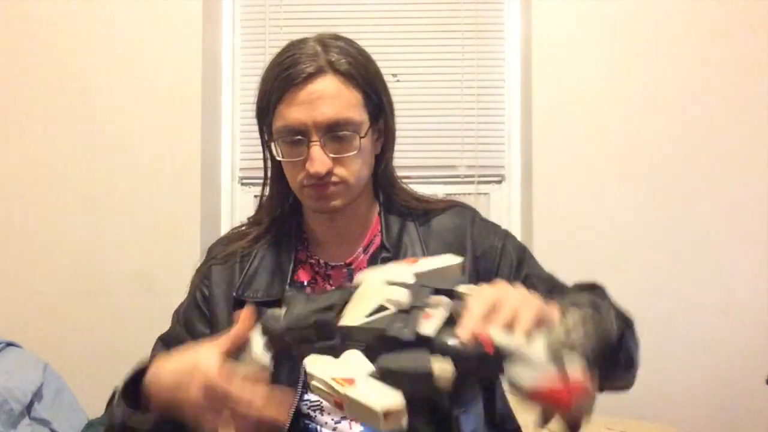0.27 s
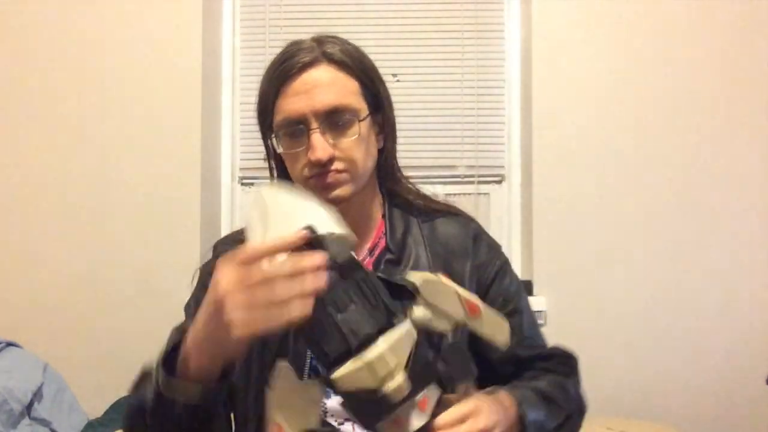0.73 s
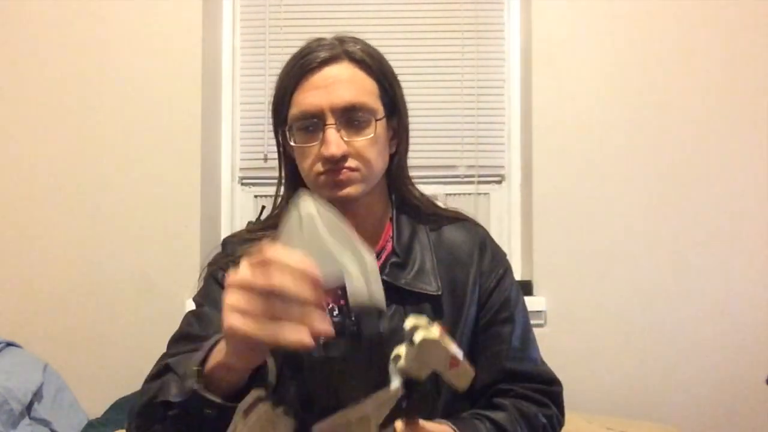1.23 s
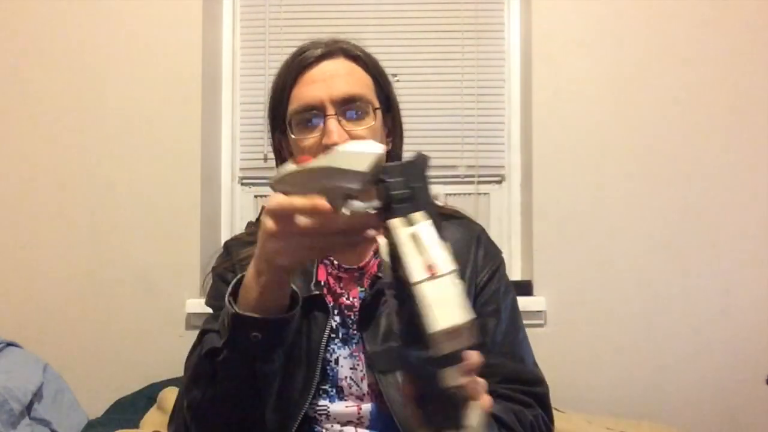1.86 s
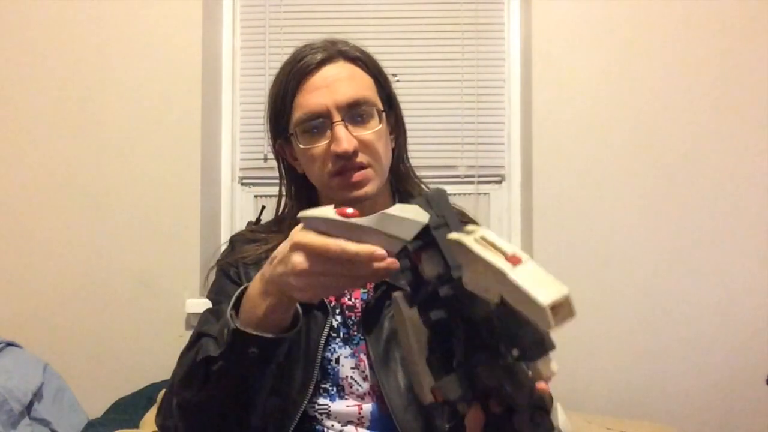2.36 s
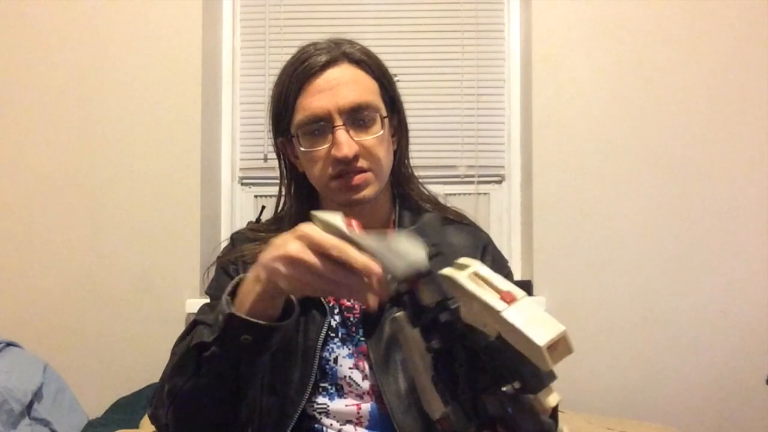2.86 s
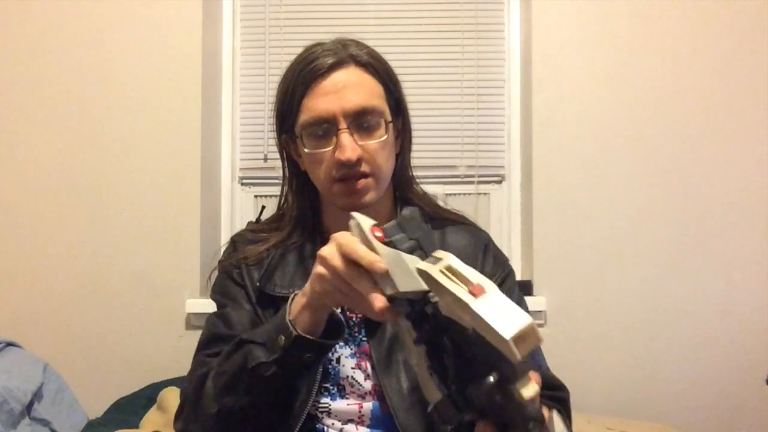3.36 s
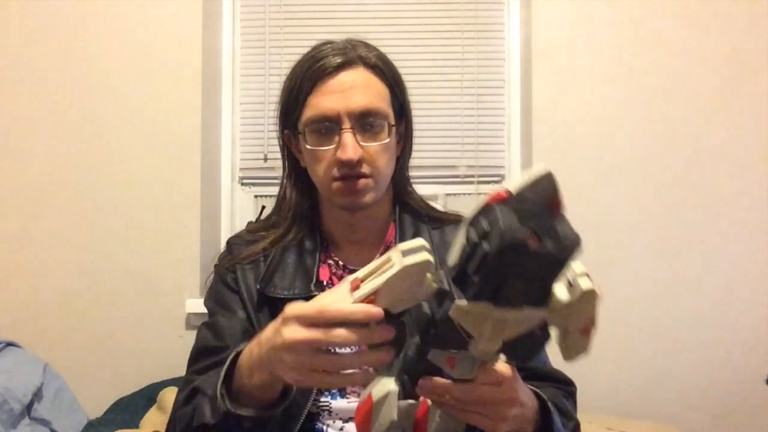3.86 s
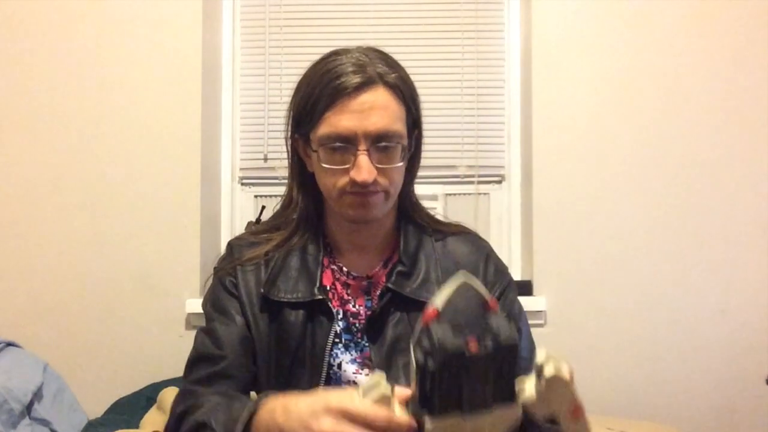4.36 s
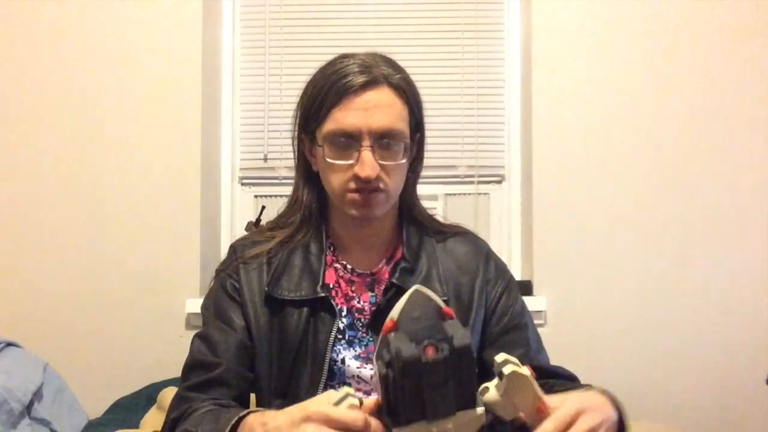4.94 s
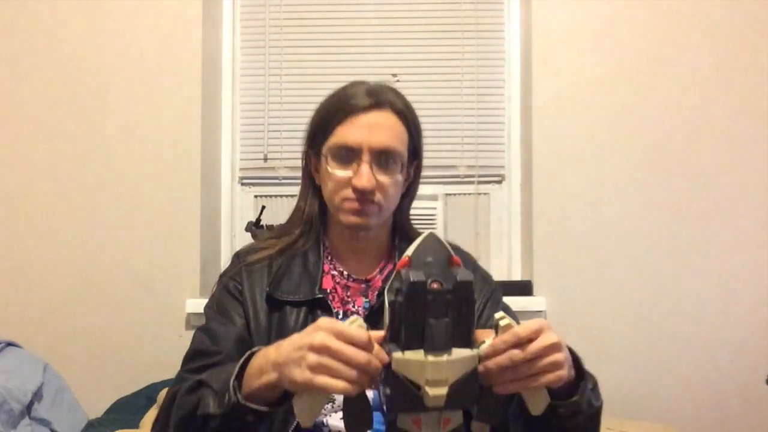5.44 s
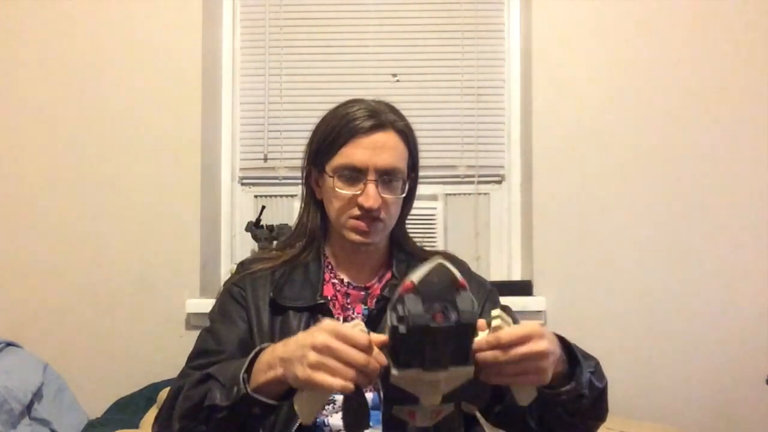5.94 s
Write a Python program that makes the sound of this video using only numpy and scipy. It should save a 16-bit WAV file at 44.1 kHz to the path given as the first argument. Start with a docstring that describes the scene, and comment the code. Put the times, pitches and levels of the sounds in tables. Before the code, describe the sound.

Stiff toy joints click from tooth to tooth as someone moves the parts by hand. After loose panel clacks, a tight double snap leads into a quick run of sharp clicks, then isolated snaps and two firm knocks. Quieter ticks and plastic rubbing continue irregularly, picking up at the close. The sounds are near and dry, with a short bright indoor reverberation and a faint steady background hiss.

```python
"""A large hollow plastic toy robot is folded by hand in a small, bare room: its ratchet joints snap from tooth
to tooth, as short bright contacts ringing pawl and shell. Loose panels knock with duller clacks. Each move of
the hands rubs the plastic in stick-slip ticks and shakes faint ticks out of the loose parts. Behind them are a
soft rumble from the arms and the room's faint steady noise."""
import sys
import numpy as np
from scipy import signal
from scipy.fft import rfft, irfft
from scipy.io import wavfile
from scipy.ndimage import map_coordinates

SR = 44100
rng = np.random.default_rng(int(sys.argv[2]) if len(sys.argv) > 2 else 0)


def digitize_waveform(pressure):
    """Quantize a signal to 16-bit integers and store it at the path in sys.argv[1].

    Rows of a 2-D input are taken as channels; values are limited to [-1, 1].
    """
    field = np.atleast_2d(pressure).T
    bounded = np.clip(field, -1, 1)
    quanta = np.round(bounded * 32767).astype(np.int16)
    wavfile.write(sys.argv[1], SR, quanta)


N = 273420
SIZE = 8192  # samples per impulse response
GRID = np.fft.rfftfreq(SIZE, 1 / SR)  # Hz


# Ratchet teeth. Each row: time in seconds, level in dB before gain_db, then relative to the crack band
# thump in dB, body in dB, treble in dB, and two resonances of the joint in Hz.
TEETH = [(1.309, -16, -14, -14, 0, 3800, 13200), (1.3174, -14.5, -17.5, -6, 3.5, 12900, 4860),
         (1.563, -12.5, -31, -7.5, 2, 13200, 8450), (1.6266, -11, -36.5, -10, -0.5, 4320, 12800),
         (1.692, -16, -24.5, -10, 0.5, 4440, 3200), (1.7546, -14.5, -29, -9.5, 0, 2930, 13800),
         (1.823, -15.5, -31.5, -2, 1.5, 2130, 4540), (2.212, -15, -23, -4.5, 4, 8440, 13100),
         (2.477, -15.5, -30, -5, 4, 4800, 11300)]
# Stiff pawl resonances. Each row: centre in Hz, width in Hz, lift in dB.
PAWL_MODES = [(4160, 200, 4.1), (6090, 480, 5.9), (8750, 1460, 4), (10740, 1500, 6.6), (13200, 670, 2.1)]
# Broad colour of a snap. Each row: frequency in Hz, relative level in dB.
SNAP_COLOUR = [(30, -40.5), (150, -20.5), (500, -15.5), (900, -11.5), (1400, -1.5), (4000, 5), (8000, 1.5),
               (12000, -2.5), (15000, 3.5), (16000, -17.5)]
TOOTH_LIFT_DB, TOOTH_ROOM_DB, TOOTH_T60_S = 7.5, 2.5, 0.014  # room: re direct sound
# the pawl catches lightly before it gives
TOOTH_LEAD_S, TOOTH_LEAD_DB = 0.009, -27.5


def ratchet(gain_db=21, push_db=-33, push_s=0.0006, push_per_thump=0.34):
    """A sprung pawl catches, then drops into each tooth: short, hard, bright, with one low push of the shell."""
    out = np.zeros(N)
    u = np.arange(SR // 50) / SR / push_s
    push = (1 - u) * np.exp(-u)
    usual_thump_db = np.mean(TEETH, axis=0)[2]
    for s, db, thump_db, body_db, treble_db, hz1, hz2 in TEETH:
        joint_db = part_ring(hz1, TOOTH_LIFT_DB) + part_ring(hz2, TOOTH_LIFT_DB)
        colour_db = along(SNAP_COLOUR) + lifts(PAWL_MODES) + joint_db
        snap = click(colour_db, thump_db, body_db, treble_db, TOOTH_ROOM_DB, TOOTH_T60_S)
        add(snap, 0, amp(push_db + push_per_thump * (thump_db - usual_thump_db)) * push)
        add(out, s, amp(db + gain_db) * snap)
        catch = knock(thump_db=-15.5, body_db=-8, treble_db=-1, hz=hz1)
        add(out, s - TOOTH_LEAD_S, amp(db + gain_db + TOOTH_LEAD_DB) * catch)
    return out


# Panels and limbs touching. Each row: time in seconds, level in dB before gain_db, then relative to the
# crack band thump in dB, body in dB, treble in dB, and the part's resonance in Hz.
PANEL_KNOCKS = [(0.093, -39, -6.5, 1.5, -2.5, 1270), (0.125, -37.5, -34, -26, -35, 3990),
                (0.264, -64, -17, 13, -25, 1640), (0.31, -46.5, -15, -5, -2, 4200),
                (0.393, -46.5, -12, -5, -2, 4320), (0.463, -22.5, -30, -11, -1, 3220),
                (0.678, -46, -13, 0, -6, 2960), (0.807, -49.5, -18, 13, 1, 1860),
                (0.899, -31, -7.5, 0, -9.5, 362), (0.979, -30, -22, -10, -5.5, 1760),
                (0.998, -33.5, -10, 3, -4, 1806), (1.035, -33.5, -14, -2, -12, 3130),
                (1.058, -25, -24, -9.5, -2.5, 3140), (1.219, -46, -30, -7.5, -25, 1360),
                (1.284, -38.5, -31, -7, -7, 3980), (1.981, -29, -18.5, -4.5, -10.5, 2750),
                (2.09, -27, -18.5, -6.5, -15, 2390), (2.158, -56.5, -3, 13, 13, 1310),
                (2.336, -43.5, -3.5, 8, -24, 1740), (2.744, -46.5, -20.5, 3.5, -37, 1300),
                (2.865, -45.5, 12, 3, 0, 705), (2.9, -39.5, -3, -4, -9, 2300),
                (2.925, -35.5, 0, 1, -10, 2200), (2.941, -26.5, -20, -1.5, -10, 2260),
                (2.959, -14.5, -21.5, -9.5, -8, 4580), (3.308, -20.5, -16, 2.5, 1, 1175),
                (3.524, -44.5, -17.5, 8, -6.5, 1800), (3.657, -48, -6, 0, -20.5, 1700),
                (3.804, -46, -11, 3, -25, 1620), (4.049, -52, -13, -18, 0, 1360),
                (4.135, -35, -49, 2, -6.5, 2130), (4.22, -47.5, -25, -7, -1.5, 1740),
                (4.382, -50.5, -31, -4.5, 0.5, 3300), (4.46, -45.5, -19, -12, -27, 2720),
                (4.526, -46, -25, -4.5, 10.5, 1790), (4.552, -44, -34, 1, 8.5, 5160),
                (4.715, -35.5, -30, -5.5, -4.5, 3120), (4.796, -44.5, -18, 1.5, 0.5, 3700),
                (4.887, -59.5, 2, 14, -26, 760), (4.946, -39.5, -21, -3.5, -6.5, 3040),
                (4.967, -40.5, -20, 1.5, -14, 1520), (5.188, -53.5, -0.5, -2.5, -10, 3100),
                (5.466, -35, -34, -17, -8.5, 3940), (5.493, -41, -18, -6, 3, 2700),
                (5.59, -42.5, -9, 2, 5.5, 1810), (5.692, -41, -16, -5.5, 1, 3310),
                (5.787, -48, -11, 0, -13, 1760), (5.84, -31, -32, -7, -0.5, 4860),
                (5.908, -31, -30, -14, -7, 3000), (5.929, -26.5, -22, -14, -3, 1570),
                (5.965, -27.5, -21, -3.5, -9, 1450), (6.026, -31.5, -18, -1, -12.5, 760),
                (6.148, -33, -26, -1, -20, 1670)]
KNOCK_LEAD_S, KNOCK_LEAD_DB = 0.0031, -14  # graze, re main contact


def knocks(gain_db=21):
    """Loose parts graze, then meet with a longer, duller clack."""
    out = np.zeros(N)
    for s, db, *part in PANEL_KNOCKS:
        clack = amp(db + gain_db) * knock(*part)
        add(out, s - KNOCK_LEAD_S, amp(KNOCK_LEAD_DB) * clack)
        add(out, s, clack)
    return out


# Broad colour of a knock. Each row: frequency in Hz, relative level in dB.
KNOCK_COLOUR = [(30, -32.5), (150, -21), (500, -5), (900, -3), (1400, 2.5), (4000, 2.5), (7000, -7),
                (11000, -15.5), (14000, -21), (16000, -27)]
KNOCK_LIFT_DB, KNOCK_ROOM_DB, KNOCK_T60_S = 10.5, 2.5, 0.03  # room: re direct sound


def knock(thump_db, body_db, treble_db, hz):
    """One clack of a loose part, lifted at the part's own resonance."""
    colour_db = along(KNOCK_COLOUR) + part_ring(hz, KNOCK_LIFT_DB)
    return click(colour_db, thump_db, body_db, treble_db, KNOCK_ROOM_DB, KNOCK_T60_S)


# Edges in Hz of a contact's thump, body, crack (the 0 dB reference) and treble bands.
BAND_EDGES_HZ = [150, 800, 2200, 6000, 15000]
# Hollow shell resonances. Each row: centre in Hz, width in Hz, lift in dB.
SHELL_MODES = [(317, 70, 4.5), (756, 210, 5.5), (1152, 95, 6.5), (1740, 210, 4), (2820, 820, 3.5),
               (4930, 1400, 1.5)]


def click(colour_db, thump_db, body_db, treble_db, room_db, t60):
    """One contact rings the shell and is heard directly and from the walls."""
    # each spot favours others of the shell's many weak modes
    spot_noise = rng.standard_normal(len(GRID))
    spot_db = 1.2 * unit(signal.fftconvolve(spot_noise, np.hanning(45), "same"))
    colour_db = colour_db + lifts(SHELL_MODES) + spot_db
    power = 2 * amp(colour_db) ** 2 / SIZE
    # where and how hard the parts meet sets the balance from thump to treble
    balance = []
    band_levels_db = [thump_db, body_db, 0, treble_db]
    for lo, hi, db in zip(BAND_EDGES_HZ, BAND_EDGES_HZ[1:], band_levels_db):
        band_power = power[(GRID > lo) & (GRID < hi)].sum()
        balance.append((np.sqrt(lo * hi), db - 10 * np.log10(band_power)))
    paths = amp(room_db) * walls()
    add(paths, 0, chatter(t60))
    return signal.fftconvolve(paths, ring(colour_db + along(balance)))


def part_ring(hz, lift_db, least_hz=140, damping=0.05):
    """The dB added by the struck part's own resonance, wide because plastic is well damped."""
    return lifts([(hz, least_hz + damping * hz, lift_db)])


def chatter(t60, rise_s=0.00029, grain_db=2, grains_per_s=1476):
    """One hard contact, of energy 1: a dying run of uneven micro-impacts."""
    t = np.arange(SIZE) / SR
    level_db = grain_db * wobble(grains_per_s, SIZE) - 60 * t / t60
    burst = rng.standard_normal(SIZE) * amp(level_db)
    burst *= 1 - np.exp(-(t / rise_s) ** 2)
    return burst / np.linalg.norm(burst)


def rattle(count=48, crowding=0.41, gain_db=18, scatter_db=2, thump_db=-13, body_db=-2, treble_db=-5,
           colour_scatter_db=2.5, part_hz=2200, spread_octaves=0.9):
    """While the hands move, small loose parts tick unevenly: louder and denser with more effort."""
    out, gain = np.zeros(N), effort()
    work = np.cumsum(gain ** crowding)
    shares = (np.arange(count) + rng.random(count)) / count
    moments = np.searchsorted(work / work[-1], shares)
    for at, (force, weight, hardness, part) in zip(moments, rng.standard_normal((count, 4))):
        tick = knock(thump_db, body_db + colour_scatter_db * weight,
                     treble_db + colour_scatter_db * hardness, part_hz * 2 ** (spread_octaves * part))
        add(out, at / SR, gain[at] * amp(gain_db + scatter_db * force) * tick)
    return out


# Broad colour of rubbing. Each row: frequency in Hz, relative level in dB.
RUB_COLOUR = [(120, -51.5), (200, -31), (360, -10.5), (416, -30), (538, -15), (735, -5), (968, -9.5),
              (1400, -4.5), (2290, -6), (3190, -5.5), (3620, -7.5), (5520, -9), (6280, -13), (10300, -16.5),
              (16000, -37.5)]


def rubbing(slips_per_s=350, scatter_db=6, gain_db=-1.5, room_db=2):
    """Plastic under the fingers sticks and slips in tiny ticks of very uneven size."""
    sizes = amp(scatter_db * np.clip(rng.standard_normal(N), -2, 2))
    slips = (rng.random(N) < slips_per_s / SR) * sizes
    ticks = coloured(slips * rng.choice([-1, 1], N), along(RUB_COLOUR))
    heard = ticks + amp(room_db) * signal.fftconvolve(ticks, walls())[:N]
    return amp(gain_db) * effort() * unit(heard)


# Moves of the hands. Each row: start of full grip in seconds, length in seconds,
# effort in dB at the start, swell in dB by the end.
HAND_MOVES = [(0, .6, -50.5, -10), (0.739, .54, -54, 5), (1.46, 0.97, -52.5, 2.5), (2.802, .155, -55.5, 20),
              (2.982, .26, -44, -12.5), (3.405, .07, -50, -2), (3.758, .3, -58.5, -3.5),
              (4.486, .16, -54.5, -1), (4.752, .15, -51, -0.5), (5.403, .31, -58, 3),
              (5.832, .18, -43.5, 5.5), (6.1, .1, -52.5, 4.5)]
REST_DB = -65.5  # even resting hands rub a little


def effort():
    """How hard the hands work the plastic, as a gain for each sample."""
    return amp(REST_DB) + sum(move(*row) for row in HAND_MOVES)


GRIP_S, RELEASE_DB_PER_S = 0.031, 220


def move(start_s, length_s, db, swell_db):
    """The gain of one move: it takes hold, swells or eases evenly in dB, and is released."""
    t = np.arange(N) / SR - start_s
    grip = np.clip(1 + t / GRIP_S, 0, 1)
    swell = swell_db * np.clip(t / length_s, 0, 1)
    release = RELEASE_DB_PER_S * np.maximum(t - length_s, 0)
    return grip * amp(db + swell - release)


# Forearms leaning as the toy is gripped again. The row: start of full grip in seconds, length in seconds,
# rumble level in dB at the start, swell in dB by the end.
ARM_LEAN = (5.58, .62, -79, 4)


def leaning():
    """A faint, soft rumble from the arms: low noise under the gain of one move."""
    colour_db = along([(25, -9.0), (60, 4), (100, 0), (150, -14.5), (400, -50)])
    return move(*ARM_LEAN) * coloured(rng.standard_normal(N), colour_db)


# Reverberation. Each row: frequency in Hz, decay time t60 in seconds.
ROOM_T60 = [(150, 0.099), (400, 0.2), (1000, 0.28), (2800, 0.32), (7000, 0.29), (15000, 0.25)]
# Nearest surfaces. Each row: delay in seconds, echo level in dB re the tail.
NEAR_ECHOES = [(.0045, -18.5), (0.0088, -15.5), (0.0148, -12.5), (0.02, -15.5)]


def walls(build_s=0.0018, lumpy_db=0.96, lumps_per_s=601.6):
    """The room's answer, of energy 1 and drawn anew on each call: a few echoes in a dense tail."""
    hz, t, z = signal.stft(rng.standard_normal(SR // 2), SR, nperseg=256)
    decay = amp(-60 * t / along(ROOM_T60, hz)[:, None])
    tail = signal.istft(z * decay, SR, nperseg=256)[1]
    tail *= 1 - np.exp(-(np.arange(len(tail)) / SR / build_s) ** 2)
    tail *= amp(lumpy_db * wobble(lumps_per_s, len(tail)))  # reflections arrive in clumps
    tail /= np.linalg.norm(tail)
    for delay_s, db in NEAR_ECHOES:
        add(tail, delay_s, amp(db) * chatter(t60=0.012))
    return tail / np.linalg.norm(tail)


# Broad colour of still air. Each row: frequency in Hz, relative level in dB.
AIR_COLOUR = [(12, -62.5), (20, -45.5), (55, -3.5), (101, -13), (172, -5.5), (434, -7.5), (472, -6),
              (660, -13), (738, -3.5), (849, -11), (1440, -4.5), (1960, -25), (3070, -10), (3440, -9.5),
              (16000, -19)]


def still_air(level_db=-62.5):
    """The faint steady noise of the room: coloured Gaussian noise."""
    return amp(level_db) * coloured(rng.standard_normal(N), along(AIR_COLOUR))


def amp(db):
    """Decibels to gain."""
    return 10 ** (np.asarray(db) / 20)


def unit(x):
    """Scaled to rms 1."""
    return x / np.sqrt(np.mean(x ** 2) + 1e-20)


def along(points, hz=GRID):
    """(Hz, value) points joined on a log frequency axis."""
    f, v = np.transpose(points)
    return np.interp(np.log(hz + 1), np.log(f), v)


def lifts(modes):
    """The dB that resonances add around their frequencies."""
    return sum(db / (1 + (2 * (GRID - hz) / width) ** 2) for hz, width, db in modes)


def ring(colour_db):
    """The causal (minimum-phase) impulse response that has this colour."""
    cepstrum = irfft(np.log(amp(colour_db) + 1e-6))
    cepstrum[1:SIZE // 2] *= 2
    cepstrum[SIZE // 2 + 1:] = 0
    return irfft(np.exp(rfft(cepstrum)))


def coloured(x, colour_db):
    """x through a colour, at rms 1."""
    return unit(signal.fftconvolve(x, ring(colour_db))[:N])


def wobble(per_s, size):
    """A smooth random curve: spline through per_s normal draws a second."""
    draws = rng.standard_normal(int(size * per_s / SR) + 4)
    return map_coordinates(draws, [np.arange(size) * per_s / SR])


def add(track, s, x):
    """Mixes x into the track, in place, from second s."""
    part = track[max(round(s * SR), 0):][:len(x)]
    part += x[:len(part)]


def scene():
    """The toy over the faint steady noise of the room."""
    return (ratchet() + knocks() + rattle() + rubbing() + leaning() + still_air())[None]


TOP_HZ = 15900


def record(dry):
    """Peaks are rounded off at full scale, then low-passed at the band limit."""
    held = dry / (1 + np.abs(dry) ** 6) ** (1 / 6)
    low_pass = signal.firwin(255, TOP_HZ, fs=SR)
    return signal.fftconvolve(held, low_pass[None], mode="same", axes=1)


dry = scene()
out = record(dry)
digitize_waveform(out)
```